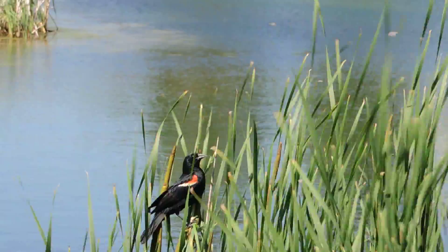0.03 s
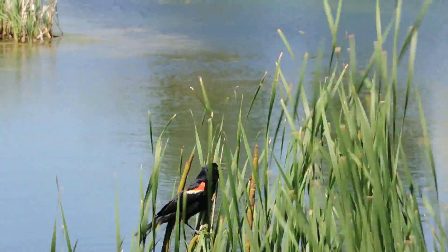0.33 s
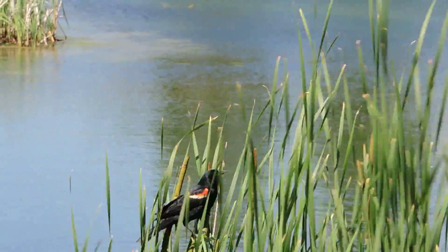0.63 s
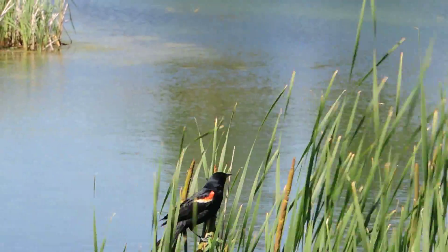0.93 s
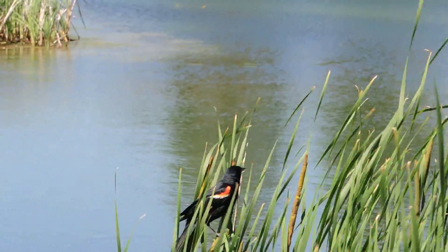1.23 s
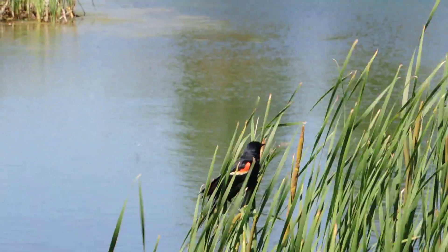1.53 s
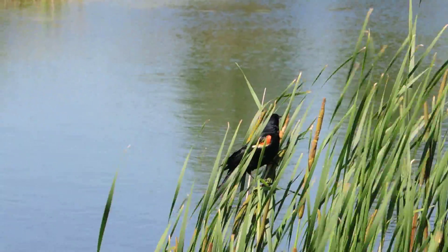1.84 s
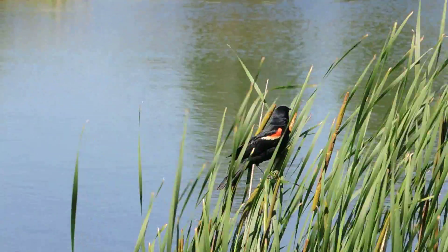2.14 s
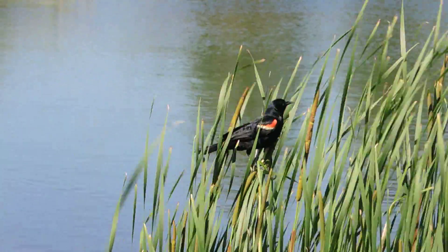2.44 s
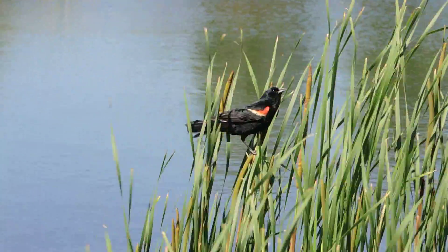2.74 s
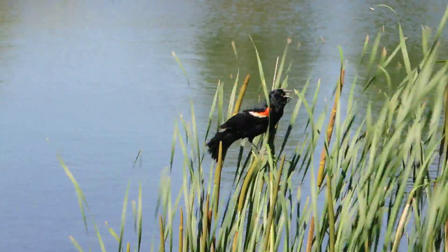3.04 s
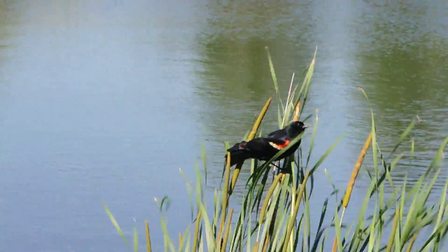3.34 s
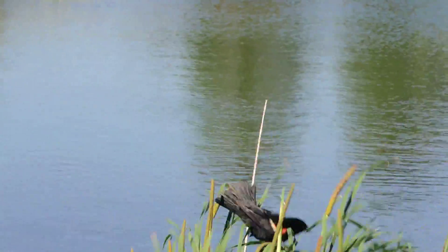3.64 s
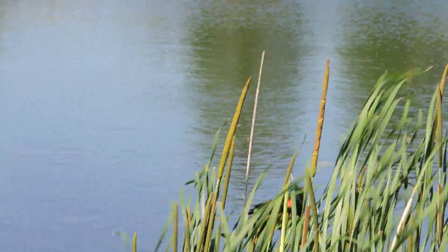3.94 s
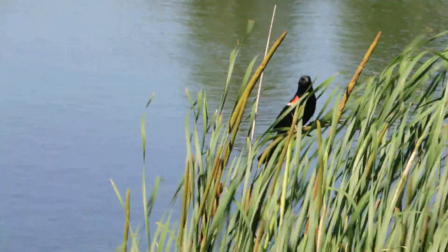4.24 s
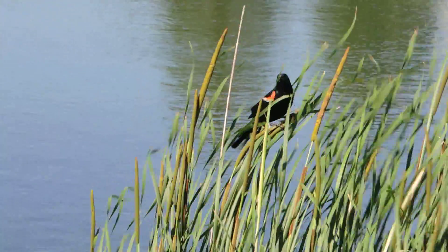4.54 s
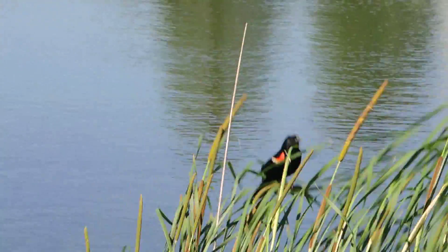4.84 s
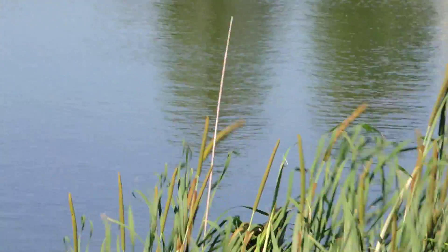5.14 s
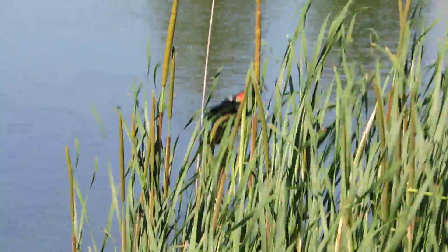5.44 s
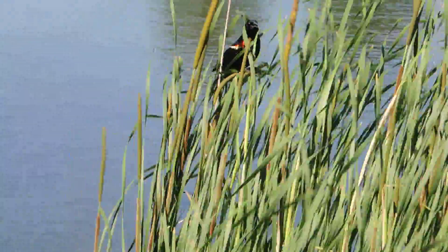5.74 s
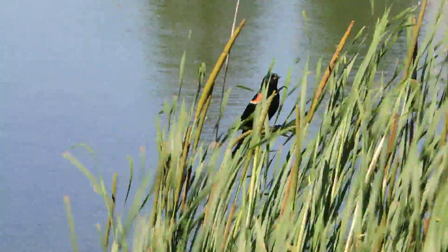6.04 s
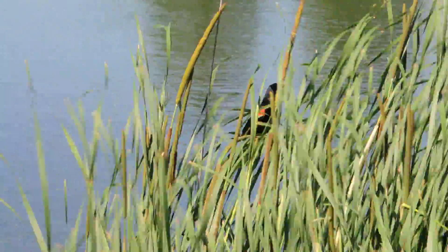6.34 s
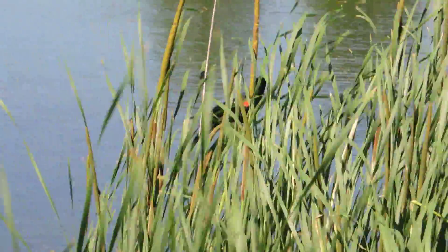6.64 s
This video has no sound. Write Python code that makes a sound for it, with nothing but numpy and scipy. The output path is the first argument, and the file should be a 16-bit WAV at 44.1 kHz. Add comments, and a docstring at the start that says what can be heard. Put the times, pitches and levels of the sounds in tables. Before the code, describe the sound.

A nearby blackbird gives sharp chirps and short rasps while gusty wind rumbles and thumps on the microphone over faintly hissing reeds.

```python
"""Blackbird at a windy pond

Close up and straight ahead, a blackbird in the reeds gives sharp whistled 'chek' notes and two harsh,
throbbing rasps. From farther off come a faint rasp and small birds' chips, pips and buzzes; reeds and
bank send the calls back. Leaves hiss and dry stems tick. Gusts rumble and thump at the microphone's
two ports, each on its own, and briefly overload them."""
import sys
import numpy as np
from scipy import signal
from scipy.fft import rfft, irfft, next_fast_len
from scipy.io import wavfile
from scipy.ndimage import uniform_filter1d, map_coordinates

SR = 44100
rng = np.random.default_rng(int(sys.argv[2]) if len(sys.argv) > 2 else 0)


def transcribe(signal):
    """Save signal, clipped to [-1, 1], as a 16-bit WAV file at the path in sys.argv[1]."""
    frames = np.atleast_2d(signal).T
    limited = np.clip(frames, -1, 1)
    pcm = np.round(limited * 32767).astype(np.int16)
    wavfile.write(sys.argv[1], SR, pcm)


N = 303408
TIME = np.arange(N) / SR
WIND_REFERENCE_DB = -25   # flow strength from which the wind brightens or dulls

# the near bird's cheks: start_s, whistle_s, whistle_hz, whistle_db, bite_db, break_db,
# low_hz, low_db, low_s, pond_send_db
CHEK_NOTES = [(0.455, 0.02545, 3170, -13.5, 3.5, -24, 2647, -17, 0.0337, 1),
              (2.694, 0.02567, 3140, -4.5, -0.5, -18, 2625, -11, 0.03125, -1.5),
              (3.853, 0.02213, 3120, -11, 2.5, -19, 2624, -11.5, 0.0339, -1),
              (4.5793, 0.022, 3067, -4, -5.5, -20.5, 2655, -5, 0.03114, -4),
              (5.9538, 0.0252, 3115, -8.5, 0.5, -16.5, 2700, -5.5, 0.03496, -1.5)]
# course of a chek's whistle: length_share, pitch_ratio, amplitude
WHISTLE_COURSE = [(0, .4, .005), (.12, .6, .018), (.19, .83, .11), (.26, .96, .48), (.45, 1, .95),
                  (.67, 1.014, .92), (.79, 1.005, .3), (.88, .88, .2), (1, .62, .02)]
# course of a chek's low note: length_share, pitch_ratio, amplitude
LOW_COURSE = [(0, 1.8, .02), (.12, 1.2, .35), (.22, 1.03, .85), (.33, 1.008, 1), (.52, .997, .82),
              (.8, .99, .13), (1, .98, .02)]
# overtones of the whistle: pitch_multiple, level_db
BITE_PARTIALS = [(2, -25.5), (3, -24.5), (4, -35)]
# partials of the period-doubled low note: pitch_multiple, level_db
DOUBLED_PARTIALS = [(.5, -36.5), (1, -2.5), (1.5, -34), (2, -37.5), (2.5, -28.5), (3, -31)]
# strain in the voice: frequency_hz, gain_db
STRAIN_SPECTRUM = [(1200, -19), (2600, 2), (5000, -9.5), (6300, -2.5), (8700, -3.5), (11500, -10)]
# crackle where the voice breaks: frequency_hz, gain_db
BREAK_SPECTRUM = [(1200, -48), (2300, -8), (3100, 8), (3700, -11), (4800, -33), (7800, -6.5),
                  (14000, -39.5)]
# rasps, one faint and far off, then two from the near bird:
# start_s, length_s, level_db, top_hz, tilt_db_per_octave, stem_send_db
RASP_CALLS = [(0.743, 0.0449, -45, 4050, -5, -4.5), (3.08, 0.0537, -18, 4452, 1, 1),
              (5.082, 0.0516, -21, 3733, -0.5, -15)]
# course of a rasp: length_share, amplitude
RASP_COURSE = [(0, .05), (.14, .2), (.26, .9), (.55, 1), (.72, .7), (.86, .22), (1, .06)]
# membrane slaps in a rasp: frequency_hz, gain_db
SLAP_SPECTRUM = [(750, -22), (1300, -7), (2200, -8.5), (3500, 5.5), (6200, -6), (8500, 2.5), (14000, -9.5)]
# distant buzzing whistles: start_s, length_s, pitch_hz, warble_depth_hz, level_db
BUZZ_CALLS = [(0.762, 0.13, 6500, 430, -43.5), (3.542, 0.151, 6513, 410, -39.5),
              (5.785, 0.14, 6360, 380, -47), (5.798, 0.074, 7820, 553, -46)]
# course of a buzz: length_share, pitch_ratio, amplitude
BUZZ_COURSE = [(0, .86, .2), (.27, 1, 1), (.55, .975, .8), (.8, .9, .55), (1, .74, .2)]
# a smaller bird farther off: start_s, length_s, pitch_hz, level_db
CHIP_CALLS = [(2.852, 0.0136, 5860, -44.5), (6.111, 0.0225, 4712, -35), (6.222, 0.034, 4370, -34.5),
              (6.331, 0.0304, 4354, -37.5)]
# course of a chip: length_share, pitch_ratio, amplitude
CHIP_COURSE = [(0, .96, .1), (.15, .975, .6), (.65, 1.015, .8), (.8, .96, 1), (.9, .84, .6), (1, .68, .1)]
# what reeds and bank send back: frequency_hz, gain_db
POND_SPECTRUM = [(1000, -7.5), (2650, -4.5), (3150, -3), (4000, -5), (5500, -1.5), (8000, -4), (14000, -21)]
# what the stems by the perch send back: frequency_hz, gain_db
STEM_SPECTRUM = [(1500, -5.5), (3300, -2.5), (4300, -9), (5300, -16), (8000, -6.5), (9500, -17)]
# single eddies hitting the microphone: start_s, relative_peak_db, left_over_right_db, sharpness_hz
BIG_EDDIES = [(0.087, -8.5, -13.5, 667), (0.176, -3, -14.5, 722), (0.205, -4.5, -16, 298),
              (0.242, -10, -10, 667), (0.262, -2, -16, 452), (0.306, -8.5, -13, 376),
              (0.33, -13, -20.5, 796), (0.443, -6.5, -11.5, 520), (0.465, -5.5, -14.5, 447),
              (0.498, -9, -12, 560), (0.665, -4.5, 11.5, 599), (0.69, -5, 14.5, 339),
              (0.708, -10, 6.5, 720), (1.434, -9, 19.5, 480), (1.7785, 3.5, 37, 682),
              (1.7822, 1.5, 30.5, 773), (2.072, -5, 30.5, 900), (2.085, -5.5, 13.5, 950),
              (2.115, -6, 19, 920), (2.312, -16.5, 15, 735), (3.484, -8, 25.5, 650),
              (3.771, -10, 22.5, 418), (3.792, -6, 20.5, 613), (3.84, -5.5, 29.5, 577), (3.908, -1, 4, 683),
              (3.942, -4.5, -21, 410), (5.889, -12, -28, 400), (6.044, -6.5, -15, 566),
              (6.137, -9.5, -14, 440), (6.252, -5, -23, 483), (6.284, -9.5, 6, 710), (6.302, -5, 22.5, 594),
              (6.344, -1.5, -17, 1060), (6.369, -1.5, 14.5, 698), (6.382, -2.5, 0.5, 906),
              (6.490, -1.5, 9, 1330), (6.545, -8.5, -0.5, 1005), (6.581, -8.5, 5, 881),
              (6.645, -5.5, -6, 724), (6.653, -6.5, 6.5, 740), (6.702, -3.5, 29, 476),
              (6.73, 4, 26.5, 432.5), (6.737, 2.5, 31.5, 1354), (6.849, -8, 30.5, 950)]
# the breeze, falling to a lull and picking up again: time_s, left_db, right_db
BREEZE_LEVELS = [(0.07, -25, -21.5), (0.2, -30.5, -23.5), (0.5, -27, -17.5), (0.6, -30.5, -37.5),
                 (0.95, -28, -33.5), (1.15, -39, -40.5), (1.46, -25.5, -22.5), (1.66, -36.5, -35),
                 (2.25, -20, -24.5), (2.8, -24.5, -25.5), (3.5, -25, -25.5), (4.0, -24, -30.5),
                 (4.55, -40, -33.5), (5.0, -45.5, -45.5), (5.75, -34, -30), (6.05, -27, -22.5),
                 (6.45, -28.5, -17), (6.88, -22, -44.5)]
# gusts on top of the breeze: crest_s, half_length_s, level_db, left_over_right_db
GUST_SWELLS = [(0.177, 0.0215, -9.5, -6), (0.307, 0.072, -23.5, -7.5), (0.472, 0.178, -26.5, -10),
               (1.062, 0.0443, -17.5, 10.5), (1.248, 0.183, -29.5, 8.5), (1.42, 0.0988, -19.5, 6),
               (1.786, 0.0846, -18, 9), (1.873, 0.105, -25.5, 6), (2.103, 0.1233, -13, 3.5),
               (2.574, 0.099, -19, -6.5), (2.742, 0.1906, -17.5, -3.5), (2.965, 0.1005, -19, 0.5),
               (3.149, 0.0325, -17, 3.5), (3.519, 0.18, -19.5, 14.5), (3.907, 0.18, -19, 9),
               (4.137, 0.0776, -23.5, 9.5), (4.192, 0.0372, -24, -23), (4.287, 0.0283, -26.5, -2),
               (5.208, 0.267, -27, 2.5), (5.588, 0.266, -29, -19), (5.974, 0.15, -17, -12),
               (6.374, 0.102, -13.5, 1.5), (6.752, 0.097, -18.5, 7), (6.847, 0.0434, -22, 4.5)]
# wind rumble at the ports, before any shift: frequency_hz, gain_db
WIND_SPECTRUM = [(25, -21), (45, -1.5), (80, 6.5), (130, 5), (200, 0.5), (300, -6), (450, -21),
                 (700, -36.5), (1000, -57.5), (1500, -59), (2400, -80.5)]
# brightness of the wind as its eddies grow finer or coarser: time_s, shift_octaves
EDDY_FINENESS = [(0.1, -0.128), (1.1, -0.166), (2.1, -0.044), (2.3, -0.295), (3.3, -0.042), (3.55, 0.194),
                 (4.15, 0.179), (5.2, -0.35), (6.25, -0.512), (6.39, 0.224), (6.85, 0.144)]
# reed stems knocking: start_s, level_db, length_s
STEM_TICKS = [(3.406, -33.5, 0.0091), (3.716, -38.5, 0.069), (3.736, -39, 0.033), (4.915, -38, 0.027)]
# level of the reed hiss, ducking under loud wind as the recorder turns down: time_s, relative_level_db
HISS_LEVELS = [(0.07, -58.5), (0.9, -57.5), (2.15, -58), (2.7, -53.5), (3.5, -51.5), (5, -50), (5.4, -51.5),
               (6.33, -55), (6.39, -63), (6.88, -60.5)]
# colour of the reed hiss: frequency_hz, gain_db
HISS_SPECTRUM = [(700, -1), (2200, -9.5), (4000, -6.5), (6000, -6), (8000, -2), (9500, 0), (11500, -6),
                 (14000, -11.5)]
# how alike the hiss is at the two ports: frequency_hz, correlation
HISS_CORRELATION = [(60, 1), (380, 0.17), (2360, 0.41), (14800, 0.11)]
# steady outdoor air: frequency_hz, gain_db
AIR_SPECTRUM = [(35, 3.5), (95, 15.5), (400, 10.5), (1200, 8.5), (2500, 2.5), (6000, -7.5), (9500, -29),
                (14000, -15.5)]


def cheks(break_s=0.012, overlap_s=0.0038, roughness=0.124, rasp_db=-28, strain_db=-30):
    """Close up, a whistle rises, strains and dives; a second voice crackles down to a lower note."""
    out = np.zeros(N)
    for start_s, whistle_s, whistle_hz, whistle_db, bite_db, break_db, *low_note, _ in CHEK_NOTES:
        u = course(whistle_s)
        ratio, swell = read(WHISTLE_COURSE, u)
        waver = 0.0055 + 0.0475 * np.abs(1 - ratio)   # the upsweep wavers until it locks on
        hz = whistle_hz * ratio * (1 + waver * drift(1200, len(u)))
        strain = from_db(strain_db) * u * coloured(rng.standard_normal(len(u)), STRAIN_SPECTRUM)
        edge = tone(hz, BITE_PARTIALS) * (1 + .3 * drift(350, len(u))) + strain
        whistle = swell * tone(hz) + from_db(bite_db) * np.sqrt(2 * u * swell) * edge
        add(out, start_s, from_db(whistle_db) * whistle)

        u = course(break_s)
        crackle = coloured(slaps(len(u), rate_hz=490, jitter=.25, air=1.0), BREAK_SPECTRUM)
        add(out, start_s + whistle_s - break_s / 2, from_db(break_db) * np.sin(np.pi * u) * crackle)

        low_hz, low_db, low_s = low_note
        u = course(low_s)
        ratio, swell = read(LOW_COURSE, u)
        shake = roughness * (1 - u) * drift(927, len(u))   # the voice steadies as the note goes on
        note = tone(low_hz * ratio * (1 + 0.238 * shake), DOUBLED_PARTIALS) * (1 + shake)
        strain = coloured(rng.standard_normal(len(u)), STRAIN_SPECTRUM)
        note += from_db(rasp_db + bite_db) * (1 - u) * strain
        add(out, start_s + whistle_s - overlap_s, from_db(low_db) * swell * note)
    return out


def rasps(rise_octaves=0.38, rise_s=.04, throb_db=2.5, throb_hz=92, chaos_hz=1500):
    """A chaotic, throbbing voice climbs and slaps; gives the direct sound and the part sent to stems."""
    out, to_stems = np.zeros((2, N))
    for start_s, length_s, level_db, top_hz, tilt, send_db in RASP_CALLS:
        u = course(length_s)
        t = u * length_s
        swell, = read(RASP_COURSE, u)
        throb = np.cos(2 * np.pi * throb_hz * (t - 0.00538))
        climb = -rise_octaves * np.maximum(1 - t / rise_s, 0) ** 2
        hz = top_hz * 2 ** (climb + 0.063 * throb)
        chaos = .12 * np.sqrt(swell) * drift(chaos_hz, len(u))
        voice = tone(hz * (1 + chaos)) * (1 + .35 * drift(chaos_hz, len(u)))
        spectrum = [(f, db + tilt * np.log2(f / top_hz)) for f, db in SLAP_SPECTRUM]
        crackle = coloured(slaps(len(u), rate_hz=750, jitter=0.32, air=1.1), spectrum)
        call = from_db(level_db + throb_db * throb) * swell * (voice + np.sqrt(swell) * crackle)
        add(out, start_s, call)
        add(out, start_s + .0068, from_db(-11) * call)   # off a stem beside the beak
        add(to_stems, start_s, from_db(send_db) * call)
    return out, to_stems


def slaps(size, rate_hz, jitter, air):
    """Membranes slap together unevenly, with turbulent air between the slaps."""
    cycles = np.cumsum(rate_hz * np.exp(jitter * drift(rate_hz, size))) / SR
    pulses = np.diff(np.floor(cycles), prepend=0)
    return rms_one(pulses) + air * rng.standard_normal(size)


def buzzes(warble_hz=130):
    """Far off, thin whistles fall with a fast warble that is deepest where they are loudest."""
    out = np.zeros(N)
    for start_s, length_s, pitch_hz, depth_hz, level_db in BUZZ_CALLS:
        u = course(length_s)
        ratio, swell = read(BUZZ_COURSE, u)
        warble = np.sin(2 * np.pi * warble_hz * length_s * u) + 0.25 * drift(800, len(u))
        hz = pitch_hz * ratio + depth_hz * np.sqrt(swell) * warble
        add(out, start_s, from_db(level_db) * swell * tone(hz))
    return out


def chips(echo_s=0.012, echo_db=-13, overtone_db=-14, snap_db=-8, snap_s=0.012):
    """Distant notes arch and dive, with a quick reflection; a raspy second voice snaps down after."""
    out = np.zeros(N)
    for start_s, length_s, pitch_hz, level_db in CHIP_CALLS:
        u = course(length_s)
        ratio, swell = read(CHIP_COURSE, u)
        hz = pitch_hz * ratio * (1 + .045 * u ** 2 * drift(1200, len(u)))
        note = from_db(level_db) * swell * tone(hz, [(1, 0), (2, overtone_db)])
        add(out, start_s, note)
        add(out, start_s + echo_s, from_db(echo_db) * note)
        u = course(snap_s)
        fall = 1.35 - .55 * u + .1 * drift(1500, len(u))
        snap = np.sin(np.pi * u) ** 2 * tone(pitch_hz * fall)
        add(out, start_s + length_s - snap_s / 3, from_db(level_db + snap_db) * snap)
    return out


def pips(level_db=-56, pitch_hz=5850, first_s=.17, gap_s=.12, length_s=.014, count=17):
    """A very distant bird pips at a nearly even pace."""
    out, swell = np.zeros(N), np.sin(np.pi * course(length_s))
    for k, (late, sharp, loud) in enumerate(rng.standard_normal((count, 3))):
        hz = pitch_hz * (1 + .013 * sharp + .04 * (swell - 1))
        add(out, first_s + gap_s * (k + .15 * late), from_db(level_db + 2 * loud) * swell * tone(hz))
    return out


def near_reeds(x, level_db=-16, delay_s=0.0205, spread_s=0.0423):
    """Sound rattles around among the stems next to the perch."""
    t = TIME[:SR // 5]
    paths = rng.standard_normal(len(t)) + 0.28 * rng.standard_normal((2, len(t)))
    response = np.exp(-((t - delay_s) / spread_s) ** 2) * coloured(paths, STEM_SPECTRUM)
    response /= np.sqrt(np.sum(response ** 2) / 2)
    return from_db(level_db) * signal.fftconvolve(x[None], response, axes=1)[:, :N]


def pond(x, reeds_db=-30, reeds_t60_s=0.253, bank_db=-45, bank_s=0.13, far_db=-37, far_t60_s=0.771):
    """Sound scatters in the reeds, returns from the bank and dies away over the water."""
    t = TIME[:SR]
    returns = [(reeds_db, from_db(-60 * t / reeds_t60_s)),
               (far_db, from_db(-60 * t / far_t60_s)),
               (bank_db, np.exp(-((t - bank_s) / .045) ** 2))]
    power = sum(from_db(2 * db) * shape ** 2 / np.sum(shape ** 2) for db, shape in returns)
    paths = rng.standard_normal(SR) + .5 * rng.standard_normal((2, SR))
    response = np.sqrt(power) * (t > .005) * coloured(paths, POND_SPECTRUM)
    return signal.fftconvolve(x[None], response, axes=1)[:, :N]


def wind(lumps_db=3.5, lump_hz=60):
    """Turbulence at each port: the stronger the flow, the smaller its eddies and brighter its rumble."""
    lumps = np.array([drift(lump_hz, N), drift(lump_hz, N)])
    stretch = 2 ** eddy_shift(lumps)[:, ::8]
    edges_hz = 22 * 2 ** np.arange(0, 7.6, .5)
    white, rumble = rng.standard_normal((2, 2, N)), 0
    for k, (low, high) in enumerate(zip(edges_hz, edges_hz[1:])):
        band = filtered(filtered(white[k % 2], [low, high], "band"), 2 * high)
        gain = from_db(at_hz(WIND_SPECTRUM, np.sqrt(low * high) / stretch))
        rumble += np.repeat(gain, 8, axis=1)[:, :N] * band
    power = uniform_filter1d(uniform_filter1d(rumble ** 2, size=1000), size=1000)
    rumble *= from_db(flow_db() + lumps_db * lumps) / np.sqrt(power)   # the flow alone sets the level
    return filtered(rumble, 38, "high")   # the ports leak the slowest swings


def flow_db(wake_db=-15.5, wake_s=0.0338, wake_delay_s=0.00534):
    """Wind strength at the two ports: breeze, gusts and the wake behind each big eddy add in power."""
    power = from_db(2 * np.array(read(BREEZE_LEVELS, TIME)))
    wakes = [(start_s + wake_delay_s, wake_s, min(peak_db, 0) + wake_db, side_db)
             for start_s, peak_db, side_db, _ in BIG_EDDIES]
    for crest_s, half_s, level_db, side_db in GUST_SWELLS + wakes:
        swell = from_db(level_db) * np.sin(np.pi * course(2 * half_s)) ** 4
        for port, gain in zip(power, port_gains(side_db)):
            add(port, max(crest_s - half_s, 0), (gain * swell) ** 2)
    return 10 * np.log10(power)


def eddy_shift(lumps, octaves_per_db=0.1014, lump_octaves=0.1917, eddy_octaves=0.276, eddy_s=0.0052):
    """Octaves by which the rumble moves up with the flow, its lumps and each big eddy."""
    fineness, = read(EDDY_FINENESS, TIME)
    shift = fineness - 0.15 + octaves_per_db * (flow_db() - WIND_REFERENCE_DB) + lump_octaves * lumps
    swell = np.hanning(int(4 * eddy_s * SR))
    for start_s, _, side_db, _ in BIG_EDDIES:
        for port, gain in zip(shift, port_gains(side_db)):
            add(port, start_s - 0.844 * eddy_s, eddy_octaves * gain * swell)
    return np.minimum(shift, 0.691)   # the port's size sets the limit


def thumps(big_db=-2, small_db=3, small_hz=520, small_count=110):
    """Big eddies thump the microphone; many small ones flutter, louder and sharper in stronger flow."""
    out = np.zeros((2, N))
    for start_s, peak_db, side_db, sharp_hz in BIG_EDDIES:
        for port, gain in zip(out, port_gains(side_db)):
            arrival_s = start_s + rng.uniform(-0.000808, 0.000774)
            add(port, arrival_s, gain * from_db(peak_db + big_db) * pop(sharp_hz))
    for port, strength_db in zip(out, flow_db()):
        for i, chance in zip(rng.integers(0, N, small_count), rng.standard_normal(small_count)):
            fineness, = read(EDDY_FINENESS, i / SR)
            octaves = fineness + 0.055 * chance + 0.0442 * (strength_db[i] - WIND_REFERENCE_DB)
            gain = from_db(strength_db[i] + small_db - 0.5 * chance)
            add(port, i / SR, gain * pop(small_hz * 2 ** octaves))
    return out


def pop(sharp_hz, leak_ratio=0.2833):
    """A pressure step of either sign, rounded by the port, leaks away with a swing back; peak 1."""
    step = filtered(np.ones(SR // 30), leak_ratio * sharp_hz, "high")
    rounded = filtered(filtered(step, sharp_hz, order=3), 1900, order=4)
    return rng.choice([-1, 1]) * rounded / np.max(np.abs(rounded))


def overload(x, corner_hz=4200):
    """The strongest buffets flatten at the microphone's full scale with a dull crack."""
    flattened = x / (1 + np.abs(x) ** 20) ** (1 / 20)
    return filtered(flattened, corner_hz)


def ticks(decay_db=23):
    """Dry stems touch with a short bright scratch."""
    out = np.zeros(N)
    for start_s, level_db, length_s in STEM_TICKS:
        u = course(length_s)
        noise = rng.standard_normal(len(u))
        scratch = coloured(noise, [(1500, -6), (4000, -5), (9000, 6.5), (14000, -6)])
        add(out, start_s, from_db(level_db - decay_db * u) * scratch)
    return out


def reed_hiss(gain_db=5, sway_db=1.5, sway_hz=14):
    """All around the microphone, leaves brush in the breeze with a smooth hiss."""
    level_db, = read(HISS_LEVELS, TIME)
    level_db -= sway_db * drift(sway_hz, N)   # clumps of leaves sway in and out
    alike = np.clip(at_hz(HISS_CORRELATION, np.fft.rfftfreq(N, 1 / SR)), 0, 1)
    mid, side = rfft(rng.standard_normal((2, N)))
    noise = irfft(np.sqrt(1 + alike) * mid + np.sqrt(1 - alike) * side * [[1], [-1]], N)
    return from_db(level_db + gain_db) * coloured(noise, HISS_SPECTRUM)


def outdoor_air(level_db=-55):
    """A faint, steady wash of open air, mostly alike at both ports."""
    noise = rng.standard_normal(N) + .5 * rng.standard_normal((2, N))
    return from_db(level_db) * coloured(noise, AIR_SPECTRUM)


def from_db(db):
    """Decibels to gain."""
    return 10 ** (np.asarray(db) / 20)


def rms_one(x):
    """Scale to rms 1."""
    return x / np.sqrt(np.mean(x ** 2) + 1e-20)


def read(rows, at):
    """Every column of a table, joined by straight lines along the first."""
    first, *columns = np.transpose(rows)
    return [np.interp(at, first, column) for column in columns]


def at_hz(points, hz):
    """A spectrum read on a log-frequency axis."""
    freqs, values = np.transpose(points)
    return np.interp(np.log(np.maximum(hz, 1)), np.log(freqs), values)


def course(length_s):
    """The share u of a sound's length gone by, sample by sample."""
    return np.linspace(0, 1, int(length_s * SR))


def add(track, start_s, sound):
    """Mix a sound in at a time."""
    i = int(start_s * SR)
    track[i:i + len(sound)] += sound[:N - i]


def drift(rate_hz, size):
    """A smooth random wander with a spread of about 1."""
    knots = rng.standard_normal(size // 8 + 4)[:int(size * rate_hz / SR) + 4]
    return map_coordinates(knots, [np.arange(size) * rate_hz / SR], order=2, mode="nearest")


def coloured(x, spectrum):
    """Give a sound a spectrum; rms 1."""
    size = next_fast_len(x.shape[-1])
    gain = from_db(at_hz(spectrum, np.fft.rfftfreq(size, 1 / SR)))
    return rms_one(irfft(rfft(x, size) * gain, size)[..., :x.shape[-1]])


def filtered(x, corner_hz, kind="low", order=2):
    """A smooth low-, high- or band-pass."""
    return signal.sosfilt(signal.butter(order, corner_hz, kind, fs=SR, output="sos"), x)


def tone(hz, partials=((1, 0),)):
    """Partials (pitch_multiple, level_db) on one pitch curve; a plain sine by default."""
    phase = 2 * np.pi * np.cumsum(hz) / SR
    return sum(from_db(db) * np.sin(multiple * phase) for multiple, db in partials)


def port_gains(side_db):
    """Left and right gains whose mean power is 1."""
    gains = from_db(np.array([side_db, -side_db]) / 2)
    return gains / np.sqrt(np.mean(gains ** 2, axis=0))


def scene(far_send_db=10.5):
    """Birds straight ahead, the far ones with more echo; wind right on the microphone."""
    chek, far = cheks(), buzzes() + chips() + pips()
    rasp, to_stems = rasps()
    direct = chek + rasp + far + ticks()
    direct = direct + 0.235 * np.gradient(direct) * [[1], [-1]]   # reaches the left port a hair sooner
    aim_db, = read([(s, db) for s, *_, db in CHEK_NOTES], TIME)   # the bird turns between notes
    echoes = pond(from_db(aim_db) * chek + rasp + from_db(far_send_db) * far) + near_reeds(to_stems)
    return direct + echoes + reed_hiss() + outdoor_air() + overload(wind() + thumps())


def record(dry, start_s=.067, fade_s=.003, cutoff_hz=14300):
    """The microphone opens after an instant of silence; peaks clip and the top is cut."""
    fade_in = np.clip((TIME - start_s) / fade_s, 0, 1)
    clipped = np.clip(dry * fade_in, -.96, .96)
    return signal.sosfilt(signal.ellip(10, .1, 90, cutoff_hz, fs=SR, output="sos"), clipped)


dry = scene()
out = record(dry)
transcribe(out)
```